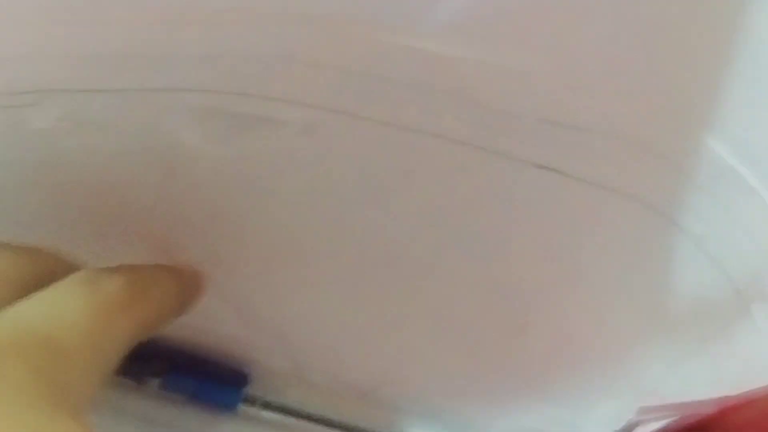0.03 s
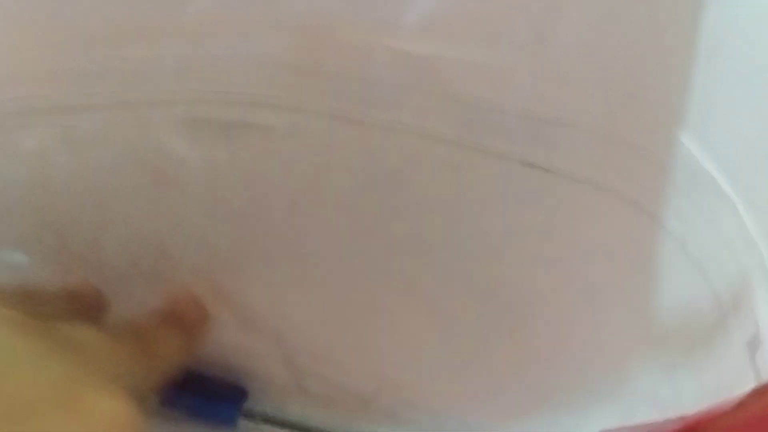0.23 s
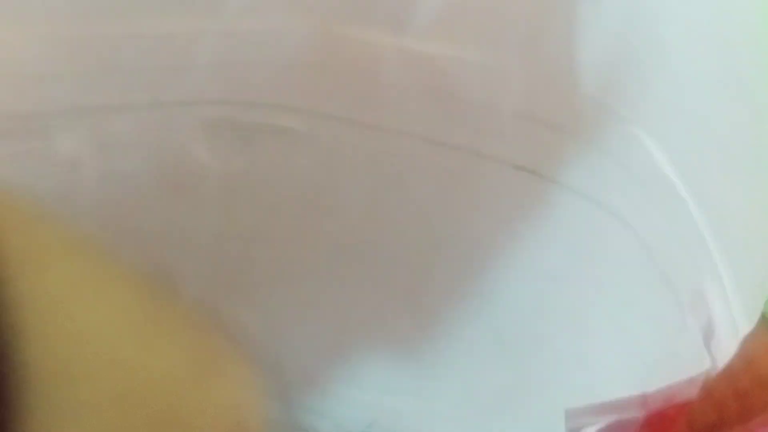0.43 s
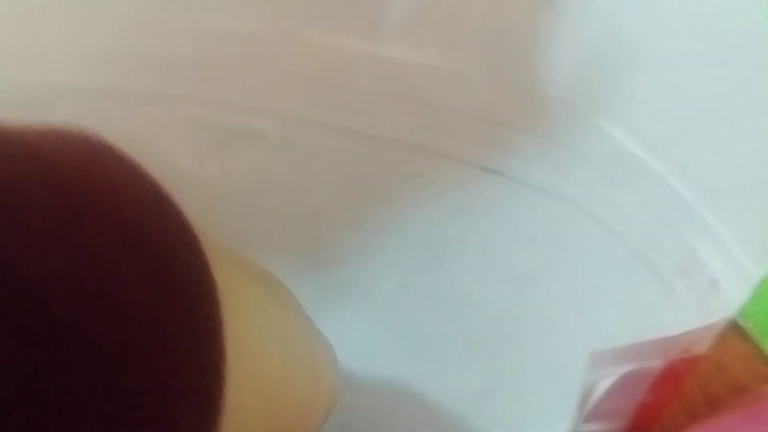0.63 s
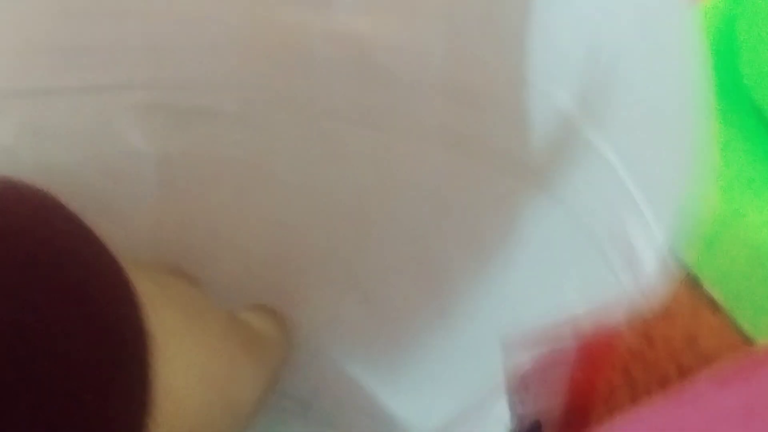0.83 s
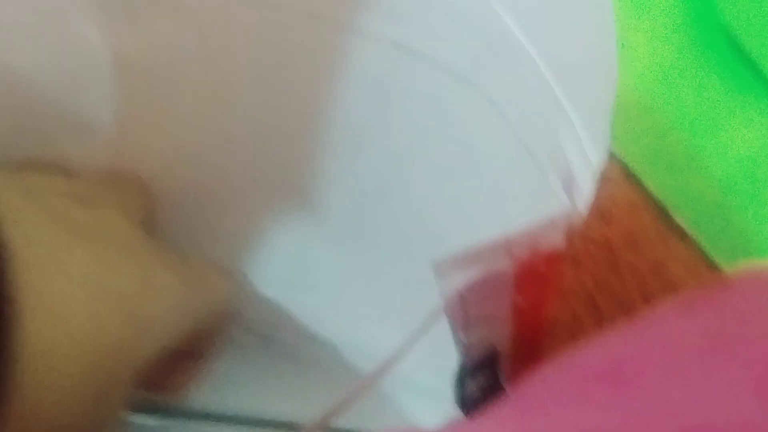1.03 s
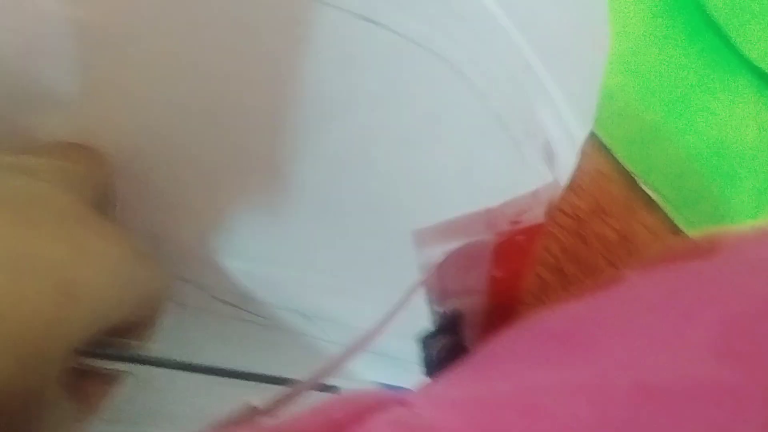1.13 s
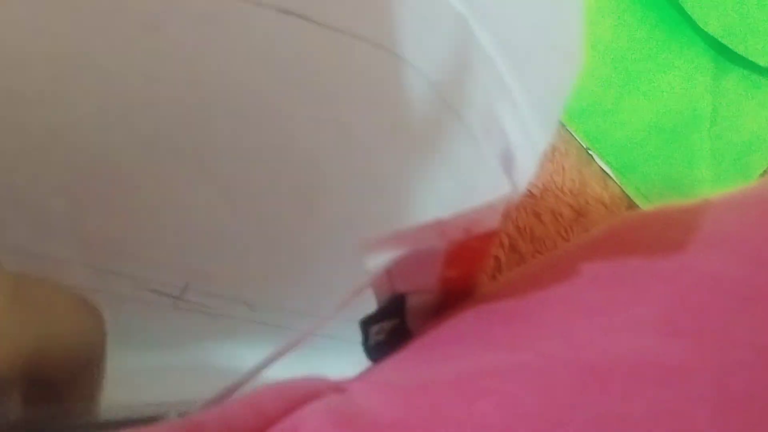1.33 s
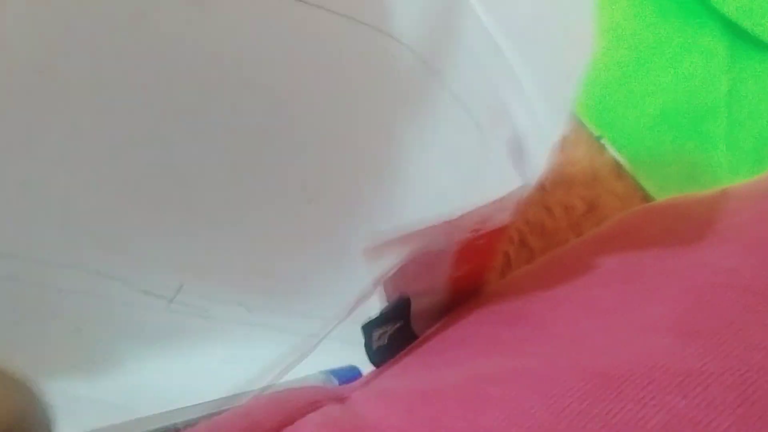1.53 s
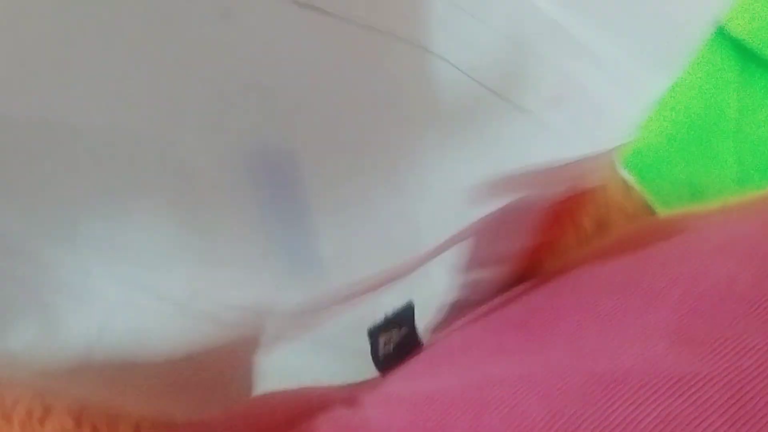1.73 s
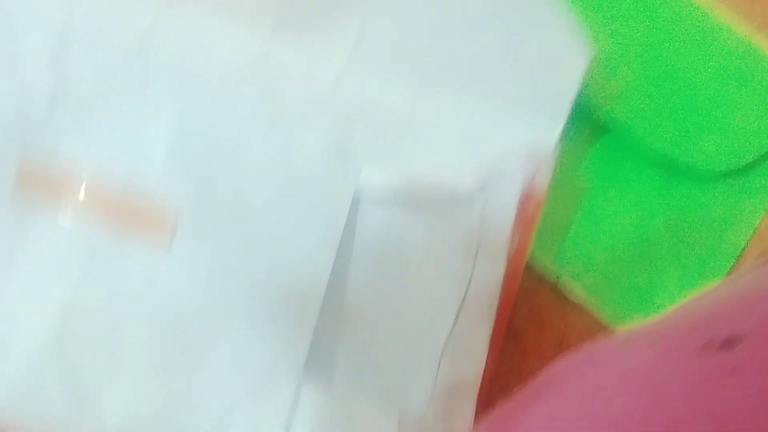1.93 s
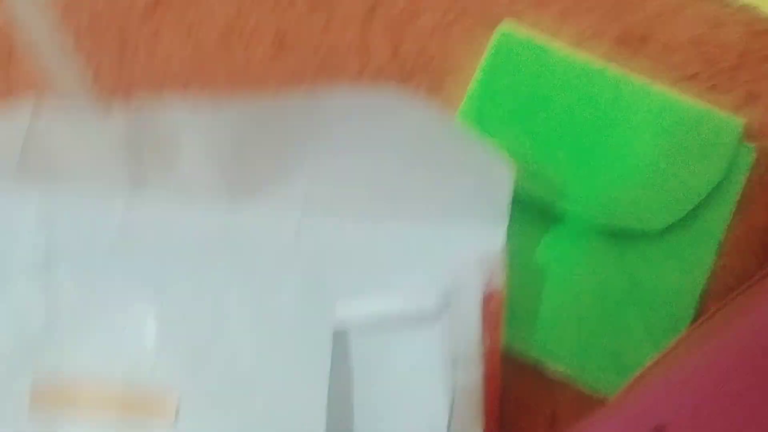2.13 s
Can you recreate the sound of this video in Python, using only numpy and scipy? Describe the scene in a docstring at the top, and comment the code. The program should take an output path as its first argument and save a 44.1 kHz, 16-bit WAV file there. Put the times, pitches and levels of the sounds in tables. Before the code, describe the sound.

A thin plastic folder crinkles and snaps as a hand rummages through its papers.

```python
"""A thin plastic folder full of paper buckles in short snaps as a hand rummages in it, close up.
Each snap is a click and a burst of tiny folds that sound the stiff sheet. In between, hand and paper
stick and slip over it with a crinkle, a fine hiss and a few crisp scuffs. Now and then a bump gives
a low thud. At the end the folder lies still in the faint background of a small, quiet room."""
import sys
import numpy as np
from scipy import signal
from scipy.fft import rfft, irfft
from scipy.io import wavfile
from scipy.ndimage import uniform_filter1d

SR = 44100
rng = np.random.default_rng(int(sys.argv[2]) if len(sys.argv) > 2 else 0)


def materialize(psi):
    """Save the field psi as 16-bit PCM at rate SR to the path in sys.argv[1].

    A 1-D psi becomes a single channel; in a 2-D psi each row is a channel.
    """
    bounded = np.clip(np.atleast_2d(psi).T, -1, 1)
    quanta = np.round(bounded * 32767).astype(np.int16)
    wavfile.write(sys.argv[1], SR, quanta)


N = 97020  # 2.2 s

# Tone colours of a snap: low flap, hollow knock, ring, bright edge. Columns: freq_hz, level_db
FLAP_EQ = [(60, -33.5), (140, -8.5), (240, -2.5), (400, -0.5), (550, -2), (750, -13.5), (1500, -41.5)]
KNOCK_EQ = [(250, -25), (500, -9), (680, -1), (930, -2), (1170, -0.5), (1400, -5), (1650, -8),
            (2100, -18.5), (4000, -37)]
RING_EQ = [(500, -35), (1400, -26), (1950, -5), (2350, -9), (2650, -5.5), (2920, 1.5), (3300, -6),
           (4000, -17.5), (5000, -45.5), (9000, -50.5)]
EDGE_EQ = [(2500, -38), (4000, -0.5), (5600, 1), (7500, 2), (8600, -1), (10000, -9), (12500, -26.5),
           (15500, -27)]
# Snap cues; the last three columns set their layers against the ring, before each layer's trim.
# Columns: start_s, decay_ms, pitch_hz, level_db, flap_db, knock_db, edge_db
SNAP_CUES = [(.058,1.9,2900,-45,-6.5,-8,-3.5), (0.1247,2.8,2600,-51,-5.5,6.5,-13),
             (.145,7,2570,-37,1,-5,-11), (0.2127,2.6,2500,-29,-17,2.5,-9), (.231,2,2200,-24.5,-12.5,-4,-19),
             (0.237,2.3,2770,-25,-16,-5,-19), (0.2829,2.05,2400,-17,-17.5,-10,-16.5),
             (0.2866,3.1,2880,-21,-9.5,-13.5,-15.5), (0.3505,2.8,3000,-32.5,-1,1,-12),
             (.387,1.9,2570,-35.5,-0.5,-11,-17), (0.3925,4.1,2595,-24.5,-9,-8.5,-16.5),
             (0.413,5.3,2450,-32,-1,-5,-21), (.498,6,2910,-33.5,-10,-14,-10),
             (.5517,4.2,2810,-23.5,-7,-4.5,-7), (0.7632,3.2,1800,-36.5,1.5,-1,-16),
             (0.8034,5.06,2620,-20.5,-14.5,-2,-15), (0.8172,5.2,2570,-32,-6,-2,-5),
             (0.8356,3.06,2760,-19,-11.5,-8.5,-9.5), (0.872,6,2480,-33,1,0.5,-13),
             (1.026,5.8,3030,-34.5,-6.5,0.5,-10), (1.0445,2.1,2600,-29,-31,-13,-30),
             (1.095,1.72,2700,-29.5,-26,-10.5,-20), (1.105,1.9,2590,-39,-4,1,-12),
             (1.2398,4.7,2770,-22,-13.5,-7,-12.5), (1.3237,1.2,2640,-30.5,-33,-12,-16),
             (1.333,8.3,2806,-26,-41,-6,-15), (1.3735,4.5,2800,-31,-13.5,-5,-18),
             (1.52,3.5,2950,-40,-23,-16.5,-12), (1.747,6,2880,-25,-4.5,-3,-16),
             (1.7662,5.3,2800,-26.5,-13,-13,-11), (1.799,8.9,3260,-31.5,-10.5,-11,-5.5),
             (1.8197,1.6,2790,-26.5,-13,-17,-18), (1.8262,1.5,2870,-36.5,-2.5,-10,-3.5),
             (1.842,3.3,2600,-37.5,-10,-12,-7), (1.9392,3.9,2560,-49.5,-7.5,-24,-13)]


def snaps(size=4096):
    """Each buckle is a click and a fast-dying train of folds; the ring pops up as the sheet stiffens."""
    flap_trim_db, knock_trim_db, ring_trim_db, edge_trim_db = 1.5, 0.92, 0.5, 0.4
    rise, end, steepness = 0.1, 1.6, 5.3  # rise and end count in decay times
    roughness, click, pop_db, edge_lag_s = 0.84, 3.42, -1.5, 0.0005
    ring_eq_pitch_hz = 2683  # the pitch at which RING_EQ plays unshifted
    norm = np.sqrt(0.005 * SR)  # a 0 dB layer has the energy of 5 ms at rms 1
    out, ms = np.zeros(N), np.arange(size) / SR * 1000
    flap, knock, edge = (response(eq) for eq in (FLAP_EQ, KNOCK_EQ, EDGE_EQ))
    for start_s, decay_ms, pitch_hz, level_db, flap_db, knock_db, edge_db in SNAP_CUES:
        ring = response([(hz * pitch_hz / ring_eq_pitch_hz, db) for hz, db in RING_EQ])
        layers = [(flap, flap_db + flap_trim_db), (knock, knock_db + knock_trim_db),
                  (ring, ring_trim_db), (edge, edge_db + edge_trim_db)]
        age = ms / decay_ms
        choke = 1 + np.exp(np.minimum(steepness * (age - end), 20))
        envelope = (1 - np.exp(-age / rise)) * np.exp(-age) / choke
        glide_hz = pitch_hz * 1.13 * (1 - 0.3775 * np.exp(-2 * age))
        pop = envelope * np.sin(2 * np.pi * np.cumsum(glide_hz) / SR)
        for body, layer_db in layers:
            push, grit = rng.standard_normal((2, size))
            folds = envelope * unit(push * np.exp(roughness * np.clip(grit, -2, 2)))
            if body is not edge:  # the first fold is too broad to sound the edge
                folds[np.argmax(envelope) // 2] -= click
            burst = unit(signal.fftconvolve(folds, body)[:size])
            if body is ring:
                burst = burst + undb(pop_db) * unit(pop)
            lag_s = edge_lag_s if body is edge else 0
            add(out, start_s + lag_s, burst / np.linalg.norm(burst) * norm * undb(level_db + layer_db))
    return out


# Tone colours of the slide: coarse crinkle and fine hiss. Columns: freq_hz, level_db
CRINKLE_EQ = [(60, -31.5), (140, -11.5), (400, -3.5), (800, -6), (1400, -8), (1900, -5.5), (2400, -1.5),
              (2950, 1), (3500, -6.5), (4400, -19.5), (15000, -40)]
HISS_EQ = [(1500, -21.5), (3050, -2.5), (4400, -13), (5700, -4), (6800, -5), (7600, -0.5), (8600, 2),
           (9300, -4.5), (12300, -10.5), (15000, -0.5)]
# Low end of the held folder flexing. Columns: freq_hz, level_db
RUMBLE_EQ = [(60, -35), (90, -6.5), (120, -6), (180, -1), (300, -30.5)]
# Fader moves of the slide, before trim and judder. Columns: time_s, crinkle_db, hiss_db
SLIDE_FADERS = [(0,-55.5,-60), (.03,-55,-52.5), (.12,-50,-49.5), (.165,-42,-46.5), (.26,-36,-43.5),
                (.335,-39.5,-46.5), (0.38,-48.5,-44), (.43,-52,-58), (0.462,-38.5,-45), (.614,-44,-44.5),
                (0.622,-49.5,-52.5), (.69,-52.5,-59), (.752,-54.5,-59), (0.781,-37,-42.5), (.855,-37.5,-47),
                (0.886,-38.5,-43.5), (.91,-55,-58.5), (.933,-42,-53), (.974,-40,-40.5), (0.985,-46,-46.5),
                (1.015,-36.5,-39), (1.055,-39.5,-38), (1.067,-49,-49.5), (1.081,-37.5,-38),
                (1.09,-51.5,-53), (1.17,-52,-53.5), (1.228,-54.5,-54), (1.255,-37.5,-49.5),
                (1.301,-42.5,-37), (1.355,-36,-40.5), (1.41,-52,-43), (1.56,-47,-41.5), (1.59,-56,-41.5),
                (1.685,-46,-39), (1.705,-51,-45.5), (1.728,-44,-44.5), (1.733,-65,-66), (1.76,-35,-44),
                (1.781,-41,-33), (1.789,-55,-64), (1.828,-36,-52), (1.86,-54,-62.5), (1.97,-68.5,-78)]


def sliding():
    """Hand and paper stick and slip in grains of crinkle and hiss; the held folder flexes and rumbles."""
    crinkle_trim_db, hiss_trim_db = -0.72, 0.82
    t = np.arange(N) / SR
    time_s, *faders = np.array(SLIDE_FADERS, float).T
    crinkle_db, hiss_db = (np.interp(t, time_s, fader) for fader in faders)
    judder_db = 1.86 * wander(rate_hz=100)  # the slide catches and slips
    crinkle = colour(grains(per_s=3400, scatter_db=1.87), CRINKLE_EQ)
    crinkle *= undb(crinkle_db + crinkle_trim_db + judder_db)
    hiss = colour(grains(per_s=8000, scatter_db=1.5), HISS_EQ)
    hiss *= undb(hiss_db + hiss_trim_db + judder_db)
    rumble = noise(RUMBLE_EQ) * undb(-30 + 0.55 * hiss_db)  # rides the hiss fader, more gently
    fade_out = np.clip((time_s[-1] - t) * 20, 0, 1)  # over the last 50 ms of the slide
    return fade_out * (crinkle + hiss + rumble)


# Ticks of a paper edge catching. Columns: start_s, length_ms, level_db
SCUFF_CUES = [(.3508,3.3,-38), (0.3929,4.5,-32.5), (.6062,10.4,-38), (.7640,2.8,-40.5), (.8165,5,-35),
              (1.1048,3.5,-36), (1.1835,2.6,-41.5), (1.677,7.4,-42), (1.7991,4,-36)]


def scuffs():
    """Paper edges catch in crisp ticks, and the sheet is pulled across the paper in one bright rasp."""
    out = np.zeros(N)
    for start_s, length_ms, level_db in SCUFF_CUES:
        add(out, start_s, rub(length_ms, level_db, HISS_EQ))
    rasp = rub(length_ms=29, level_db=-38, eq=EDGE_EQ)
    add(out, 1.748, rasp)
    return out


def rub(length_ms, level_db, eq, size=4096):
    """Dense friction noise that starts at once, holds and stops sharply."""
    age = np.arange(size) / SR * 1000 / length_ms
    return noise(eq, size) * undb(level_db) / (1 + age ** 9.4)


# Low modes of the folder. Columns: pitch_hz, level_db, t60_s
FOLDER_MODES = [(115.8, -8, 0.25), (138.4, -0.5, 0.068), (168.4, -1, 0.084), (248, 3.5, 0.054),
                (310.3, -2, 0.093), (460, -11, 0.082), (630, -9, 0.052)]
# Bumps that drive those modes. Columns: start_s, strength_db, favoured_hz
BUMP_CUES = [(.15,-41,190), (0.291,-38,90), (.351,-22,112), (.395,-25.5,117), (0.416,-37,130),
             (.499,-31,220), (0.551,-30,330), (0.802,-21.5,187), (0.835,-29,139), (1.09,-35.5,119),
             (1.191,-34,273), (1.326,-36.5,130), (1.362,-35.5,115), (1.487,-37,164), (1.747,-24,285),
             (1.863,-39,600)]


def bumps():
    """Soft blows ring the folder's low modes; where a blow lands decides which ones it favours."""
    attack_s, focus_db_per_octave = 0.0037, 9
    out, t = np.zeros(N), np.arange(N // 4) / SR
    pitch_hz, level_db, t60_s = np.array(FOLDER_MODES, float).T[:, :, None]
    for start_s, strength_db, favoured_hz in BUMP_CUES:
        detune = 1 + 0.018 * rng.standard_normal(pitch_hz.shape)
        gain = undb(level_db - focus_db_per_octave * np.abs(np.log2(pitch_hz / favoured_hz)))
        modes = gain * np.sin(2 * np.pi * pitch_hz * detune * t) * np.exp(-np.log(1000) * t / t60_s)
        thud = modes.sum(0) * (1 - np.exp(-t / attack_s))
        add(out, start_s, thud * undb(strength_db))
    return out


def room(x):
    """The close walls add a short, diffuse tail, duller than the direct sound."""
    send_db, t60_s, predelay_s, damping_hz = -14, 0.14, 0.008, 5500
    t = np.arange(N // 4) / SR
    tail = rng.standard_normal(len(t)) * np.exp(-np.log(1000) * t / t60_s) * (t > predelay_s)
    damping = signal.butter(2, damping_hz, fs=SR, output="sos")
    tail = signal.sosfilt(damping, tail / np.linalg.norm(tail))
    return x + undb(send_db) * signal.fftconvolve(x, tail)[:N]


# Tone colour of the quiet room. Columns: freq_hz, level_db
ROOM_TONE_EQ = [(55, -34.5), (85, -4), (150, 2), (230, -9), (450, -10.5), (700, -24), (2800, -22),
                (4200, -41), (6800, -40), (8600, -30.5), (10500, -40.5), (12500, -41.5), (15400, -30)]


def room_tone(level_db=-58):
    """A faint, steady bed of mostly low noise."""
    return noise(ROOM_TONE_EQ) * undb(level_db)


def undb(db):
    """Decibels to gain."""
    return 10 ** (np.asarray(db) / 20)


def unit(x):
    """Scale to an rms of 1."""
    return x / np.sqrt(np.mean(x ** 2) + 1e-20)


def add(out, start_s, x):
    """Mix x into out from a given time on."""
    i = max(int(start_s * SR), 0)
    out[i:i + len(x)] += x[:len(out) - i]


def response(eq, size=4096):
    """Minimum-phase impulse response of unit energy that follows an EQ curve."""
    hz, db = np.array(eq, float).T
    bins_hz = np.maximum(np.arange(size // 2 + 1) * SR / size, 1)
    gain = undb(np.interp(np.log(bins_hz), np.log(hz), db))
    cepstrum = irfft(np.log(gain))
    cepstrum[1:size // 2] *= 2  # folded onto positive time: nothing rings before the hit
    cepstrum[size // 2 + 1:] = 0
    impulse = irfft(np.exp(rfft(cepstrum)))
    return impulse / np.linalg.norm(impulse)


def colour(x, eq):
    """Pass x through an EQ curve."""
    return signal.fftconvolve(x, response(eq))[:len(x)]


def noise(eq, size=N):
    """Steady coloured noise, rms 1."""
    return unit(colour(rng.standard_normal(size), eq))


def wander(rate_hz):
    """Smooth random drift, rms 1."""
    width = max(int(SR / rate_hz), 1)
    return unit(uniform_filter1d(uniform_filter1d(rng.standard_normal(N), width), width))


def grains(per_s, scatter_db):
    """Dense tiny clicks of uneven size, rms 1."""
    hits = rng.random(N) < per_s / SR
    gain = undb(scatter_db * np.minimum(rng.exponential(size=N), 2 * np.pi))
    return unit(hits * gain * rng.choice([-1, 1], N))


def scene():
    """The folder in the room, over the room tone, in mono."""
    bed = room_tone()
    folder = snaps() + scuffs() + sliding() + bumps()
    return (room(folder) + bed)[None]


def record(dry):
    """The microphone drops the deepest bass and cuts the top."""
    low_cut_hz, high_cut_hz = 70, 15750
    low_cut = signal.butter(3, low_cut_hz, "high", fs=SR, output="sos")
    high_cut = signal.ellip(10, 0.2, 75, high_cut_hz, fs=SR, output="sos")
    return signal.sosfilt(high_cut, signal.sosfilt(low_cut, dry))


dry = scene()
out = record(dry)
materialize(out)
```